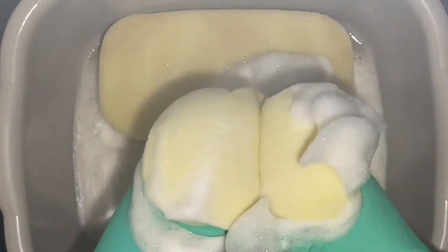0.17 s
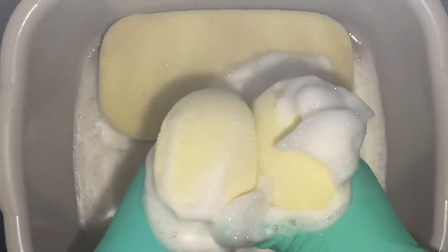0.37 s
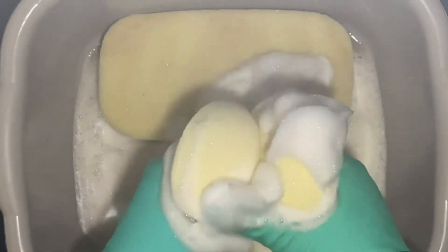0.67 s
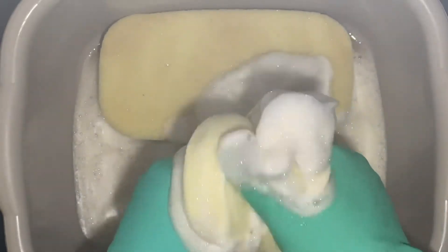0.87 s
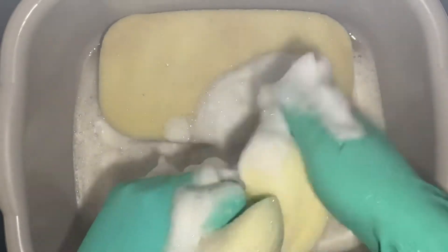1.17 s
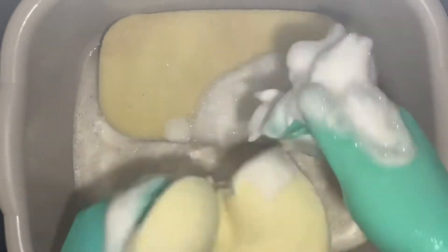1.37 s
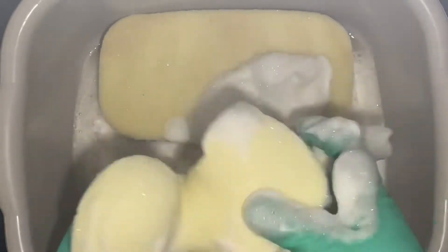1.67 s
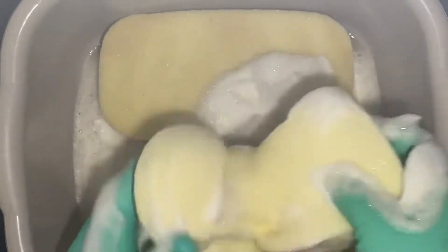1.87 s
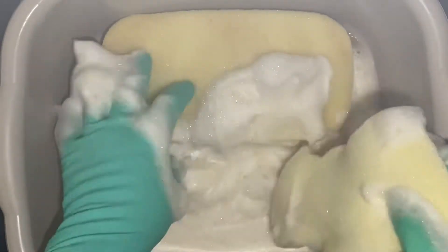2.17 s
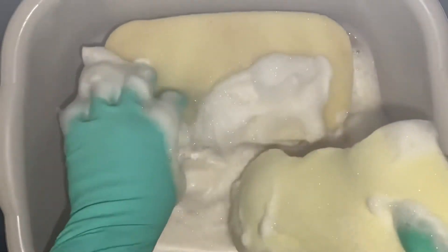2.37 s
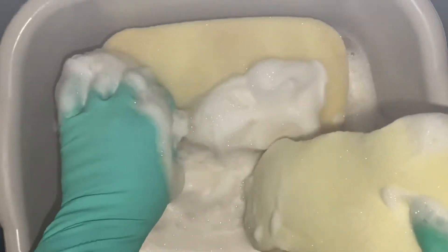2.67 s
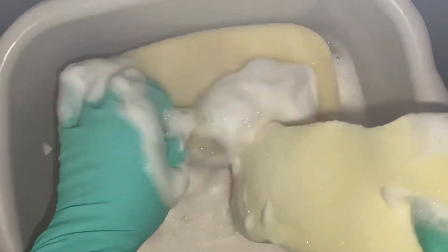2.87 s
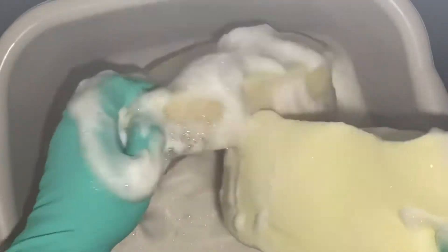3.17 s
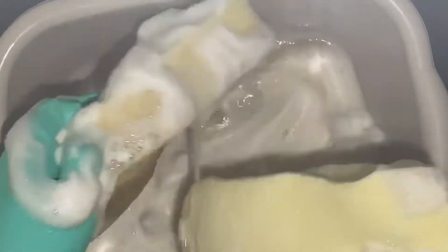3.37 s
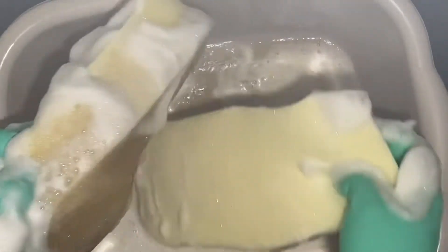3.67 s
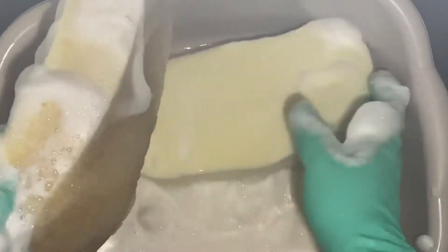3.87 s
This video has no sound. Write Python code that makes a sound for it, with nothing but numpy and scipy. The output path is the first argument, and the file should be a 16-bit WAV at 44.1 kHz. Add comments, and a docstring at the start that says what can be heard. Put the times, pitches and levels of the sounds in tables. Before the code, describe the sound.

Soft lather fizz and watery plops, then a sudden burst of gulping squelches, a low shudder and dull thumps in a plastic basin.

```python
"""Foam fizzes out of a big sponge wrung by gloved hands over a basin of suds; lather crackles, water runs down.
A second, soaked sponge is then peeled off the bottom: it shudders in stick and slip on the basin floor,
gulps air in a few loud squelches and comes free with a thump; the first one is laid back in the water.
Foam is coloured random pops, bubbles and plastic are decaying sines, spray and slosh are coloured noise.
Hum and a dull rumble lie underneath."""
import sys
import numpy as np
from scipy import signal
from scipy.fft import rfft, irfft, next_fast_len
from scipy.io import wavfile

SR = 44100
rng = np.random.default_rng(int(sys.argv[2]) if len(sys.argv) > 2 else 0)


def pcm_store(signal):
    """Save signal as 16-bit PCM."""
    levels = np.round(np.clip(np.atleast_2d(signal), -1, 1) * 32767)
    wavfile.write(sys.argv[1], SR, levels.astype(np.int16).T)


N = 177414
TIME = np.arange(N) / SR  # seconds

# spectrum of the pores fizzing, also the coarse part of a tear: freq_hz, density_db (dB per Hz, relative)
FIZZ_COLOUR = [(900, -15.5), (1900, -0.5), (2350, 0), (2850, 1.5), (3200, -1.5), (3750, 3), (5100, 2),
               (6200, -3), (7000, -3), (8200, -9), (10000, -5), (16000, -9)]
# spectrum of the finest lather: freq_hz, density_db (dB per Hz, relative)
LATHER_COLOUR = [(3000, -24), (6300, -9), (8300, 1), (9800, 0.5), (11000, 3), (12000, 1.5), (13600, 3.5),
                 (15000, 3.5), (15700, 0.5)]


def from_db(db):
    """Decibels to gain."""
    return 10 ** (np.asarray(db) / 20)


def rms_one(x):
    """Scale to unit power."""
    return x / np.sqrt(np.mean(x ** 2) + 1e-20)


def curve_in_time(rows):
    """Draw straight lines between (time, value) points, one value for every sample."""
    times_s, values = np.transpose(rows)
    return np.interp(TIME, times_s, values)


def decay(age_s, t60):
    """Exponential fade that falls by 60 dB in t60 seconds."""
    return np.exp(-np.log(1000) * age_s / t60)


def noise():
    """White noise."""
    return rng.standard_normal(N)


def coloured(x, colour):
    """Give a signal a smooth spectrum, drawn over log frequency; unit power."""
    freq_hz, density_db = np.transpose(colour)
    size = next_fast_len(N)
    bins_hz = np.maximum(np.fft.rfftfreq(size, 1 / SR), 1)
    gain = from_db(np.interp(np.log(bins_hz), np.log(freq_hz), density_db))
    return rms_one(irfft(rfft(x, size) * gain, size)[:N])


def burst(start, swell, t60):
    """An envelope that swells from its start and dies away; times in seconds."""
    envelope = np.zeros(N)
    alive = slice(max(round(start * SR), 0), round((start + 2 * t60) * SR))
    age = np.maximum(TIME[alive] - start, 0)
    envelope[alive] = (1 - np.exp(-age / swell)) * decay(age, t60)
    return envelope


def press(start, end, db, attack=0.0064, build_db=6, t60=0.15):
    """An effort that sets in, builds to its full level at the end and is released; times in seconds."""
    age, after = np.maximum(TIME - start, 0), np.maximum(TIME - end, 0)
    to_go = np.clip((end - TIME) / max(end - start, 1e-3), 0, 1)
    return from_db(db - build_db * to_go) * (1 - np.exp(-age / attack)) * decay(after, t60)


def ring(clicks, hz, t60):
    """A two-pole resonator: a unit click sets a sine of height 1 ringing."""
    radius, angle = decay(1 / SR, t60), 2 * np.pi * hz / SR
    feedback = [1, -2 * radius * np.cos(angle), radius * radius]
    return signal.lfilter([0, np.sin(angle)], feedback, clicks + 1e-18)


def flutter(per_s):
    """Random drift: straight lines between per_s chance values a second; unit power."""
    knots = np.arange(N) * per_s / SR
    return rms_one(np.interp(knots, np.arange(N), noise()))


def pops(per_s, spread_db, clump_db):
    """Soap films burst at random, in sizes set by the spread and in clumps."""
    size_db = spread_db * np.minimum(rng.exponential(1, N), 4)
    clicks = from_db(size_db) * rng.choice([-1, 1], N)
    bursting = rng.random(N) < per_s / SR
    return clicks * bursting * from_db(clump_db * flutter(per_s=150))


def pings(per_s, cycles, low_hz, high_hz, count=12):
    """Larger bubbles burst, each ringing for some cycles at a pitch set by its size class; unit power."""
    bursts = pops(per_s, spread_db=0.0, clump_db=1.5)
    size_class = rng.integers(0, count, N)
    pitches_hz = np.geomspace(low_hz, high_hz, count)
    voices = (ring(bursts * (size_class == k), hz, cycles / hz) for k, hz in enumerate(pitches_hz))
    return rms_one(sum(voices))


def wring_flow():
    """Strength of the foam leaving the sponge as both hands wring it; it stops at the last point."""
    # flow of foam: time_s, level_db
    wring = [(0, -54.5), (.12, -58), (.27, -56.5), (.48, -58.5), (.56, -62.5), (.62, -59.5), (.76, -62.5),
             (.94, -65), (1.1, -63), (1.16, -80)]
    return from_db(curve_in_time(wring)) * (TIME < wring[-1][0])


def foam_levels():
    """Wringing, gripping and the resting suds add up in power: strength of seething, fizz and lather."""
    # a hand grips, shifts or lays down a sponge:
    # start_s, end_s, fizz_db, seethe_db (relative to fizz), lather_db (relative to fizz)
    grips = [(1.12, 1.212, -64, -9, 5.5), (1.533, 1.675, -64, -1, 3), (1.68, 1.776, -58.5, -1.5, 2.5),
             (1.785, 1.848, -65.5, 0.5, 10), (1.929, 2.018, -62.5, 0, 6), (2.07, 2.172, -62, -2.5, 4),
             (2.277, 2.369, -60, -2.5, 1), (2.515, 2.733, -55.5, 5, 0.5), (2.758, 2.805, -59, -2, -0.5),
             (2.87, 2.965, -70, 1, 7), (2.99, 3.102, -65.5, -2, 4.5), (3.17, 3.255, -67, -1.5, 7),
             (3.28, 3.358, -62, -2.5, 2.5), (3.667, 3.763, -59.5, 2.5, 2), (3.777, 3.838, -61, 6.5, 7)]
    # suds left alone keep bursting, levels at the start: seethe_db, fizz_db, lather_db
    resting_db = (-68.5, -70, -62)
    wetter_db_per_s, settle_db_per_s = 8.5, 0.14

    flow = wring_flow()
    # more water comes with the air as the sponge flattens, so the seething gains on the fizz
    wet_flow = flow * from_db(-3.5 + wetter_db_per_s * TIME)
    power = np.array([wet_flow, flow, flow * from_db(0.5)]) ** 2
    for start, end, fizz_db, seethe_db, lather_db in grips:
        power += np.outer(from_db([seethe_db, 0, lather_db]), press(start, end, fizz_db)) ** 2
    resting = np.outer(from_db(resting_db), from_db(-settle_db_per_s * TIME))
    return np.sqrt(power + resting ** 2)


def foam():
    """Big wet cells seethe, the pores fizz, and the finest lather crackles on top with ringing bubbles."""
    # spectrum of the big cells: freq_hz, density_db (dB per Hz, relative)
    seethe_colour = [(120, -1.5), (220, -10), (310, -2), (430, -3.5), (560, -3.5), (760, 0.5), (1000, -3),
                     (1400, -3), (2000, -9.5), (3200, -18), (6000, -65)]
    seethe_level, fizz_level, lather_level = foam_levels()

    seethe = from_db(-1.37) * coloured(pops(per_s=5000, spread_db=2.5, clump_db=1.14), seethe_colour)
    fizz = from_db(1.34) * coloured(pops(per_s=9000, spread_db=2.5, clump_db=1.5), FIZZ_COLOUR)
    lather = coloured(pops(per_s=12000, spread_db=4.5, clump_db=1.46), LATHER_COLOUR)
    bubbles = from_db(-13.5) * pings(per_s=390, cycles=23, low_hz=3650, high_hz=13600)
    return seethe_level * seethe + fizz_level * fizz + lather_level * (lather + bubbles)


def hollow():
    """Escaping foam excites the resonances of the hollow between the gloves and the folded sponge."""
    # resonances: freq_hz, width_hz, level_db
    resonances = [(770, 115, 3.5), (995, 140, 0.5), (1663, 43, 1.5), (2740, 220, -1), (4060, 280, -8),
                  (4930, 460, -7), (7500, 690, -5), (8120, 580, -3), (8900, 210, -10)]
    crackle = pops(per_s=9000, spread_db=0.0, clump_db=0.0)
    voiced = np.zeros(N)
    for hz, width_hz, db in resonances:
        voiced += from_db(db) * signal.lfilter(*signal.iirpeak(hz, hz / width_hz, fs=SR), crackle)
    return wring_flow() * from_db(-1) * rms_one(voiced)


def runoff():
    """Wrung-out, sudsy water plops softly into the basin: sparse pops in a low colour."""
    # water running down: start_s, end_s, level_db
    runs = [(0, 0.807, -67.5), (0.804, 1.065, -60.5), (1.397, 1.85, -67), (1.95, 2.148, -70),
            (2.295, 2.37, -65.5), (3.075, 3.12, -65.5), (3.25, 3.45, -68.5), (3.778, 3.865, -60)]
    # its spectrum: freq_hz, density_db (dB per Hz, relative)
    runoff_colour = [(120, -23), (205, 2), (250, -0.5), (278, -15), (335, 1), (400, 0.5), (500, -4),
                     (800, -23)]
    plops = coloured(pops(per_s=1000, spread_db=3.5, clump_db=-0.5), runoff_colour)
    return sum(press(*row) for row in runs) * plops


def room_tone():
    """A motor's slightly unsteady hum, sines with a drifting phase, over a dull rumble of noise."""
    # motor tones: pitch_hz, level_db (rms)
    motor_tones = [(47.7, -65.5), (141, -77)]
    # rumble spectrum: freq_hz, density_db (dB per Hz, relative)
    room_colour = [(20, -24), (36, -2), (46, 8.5), (54, -10), (66, -10), (100, -1), (135, -4), (165, -10.5),
                   (400, -8.5), (1500, -37)]
    hum = np.zeros(N)
    for hz, db in motor_tones:
        phase = 2 * np.pi * hz * TIME + 0.5 * flutter(per_s=8.5)
        hum += from_db(db) * np.sqrt(2) * np.sin(phase)
    return hum + from_db(-68) * coloured(noise(), room_colour)


def slosh():
    """After each push the water rocks and settles: low noise that swells and fades, added in power."""
    # pushes on the water: start_s, level_db
    pushes = [(.18, -66), (.8, -60.5), (1.04, -65), (1.75, -63.5), (2.17, -59.5), (2.235, -62),
              (2.84, -51.5), (3.08, -61), (3.3, -53), (3.36, -60.5), (3.53, -61), (3.77, -58)]
    # spectrum of the rocking water: freq_hz, density_db (dB per Hz, relative)
    slosh_colour = [(30, -8), (60, 4), (95, 1), (130, 3), (170, -1.5), (240, -16), (330, -22), (420, -10.5),
                    (700, -29)]
    power = sum((from_db(db) * burst(s, swell=0.011, t60=0.8)) ** 2 for s, db in pushes)
    return np.sqrt(power) * coloured(noise(), slosh_colour)


def jets():
    """Foam forced through a gap between the fingers hisses as coloured noise."""
    # squirts: start_s, end_s, level_db
    squirts = [(0.616, 0.794, -59), (0.784, 0.888, -51.5)]
    # their spectrum: freq_hz, density_db (dB per Hz, relative)
    jet_colour = [(2500, -12.5), (3400, -9), (4100, -2.5), (5000, -6), (6200, -20), (7500, -11), (8300, 0),
                  (9100, -3.5), (10000, -8), (13000, -8), (16000, -17)]
    return sum(press(*row) for row in squirts) * coloured(noise(), jet_colour)


def tears():
    """A clump of lather parts and many tiny films snap at once."""
    # tearing clumps: start_s, level_db (before the two gains below), t60_s
    clumps = [(0.802, -51, 0.1), (.957, -52.5, 0.056), (1.023, -44, 0.03), (1.104, -51, 0.085),
              (1.211, -51, 0.043), (1.254, -53.5, 0.046), (1.371, -58, 0.12), (1.645, -53, 0.076),
              (1.762, -52.5, .06), (1.950, -49, 0.057), (2.067, -49, 0.049), (2.164, -53, 0.089),
              (2.518, -52, 0.061), (2.539, -48, 0.066), (2.831, -39.5, 0.028), (2.94, -55, 0.037),
              (3.159, -51, 0.052), (3.429, -61, 0.039), (3.601, -56, 0.062), (3.677, -52.5, 0.11),
              (3.821, -53, .08), (3.940, -55.5, 0.045)]
    strength = sum(from_db(db) * burst(s, swell=0.004, t60=t60) for s, db, t60 in clumps)
    fine = coloured(pops(per_s=20000, spread_db=2.5, clump_db=0), LATHER_COLOUR)
    coarse = coloured(noise(), FIZZ_COLOUR)
    return strength * (from_db(7.0) * fine + from_db(-2.0) * coarse)


def squelches():
    """Each gulp of air, or falling drop, rings an air pocket, knocks the basin and throws a short splash."""
    # air gulped under the sponge; the rows at 3.7601 s and 3.7871 s are drops falling into the water: #
    # start_s, knock_db, bubble_hz, bubble_db, bubble_t60_s, splash_db, splash_t60_s
    gulps = [(1.0500, -52, 1140, -41, 0.033, -63, 0.075), (1.9505, -60, 930, -53, .03, -51.5, 0.091),
             (2.6160, -41.5, 674, -24.5, 0.025, -31, 0.053), (2.618, -54, 1346, -39, 0.084, -46, 0.096),
             (2.6895, -31.5, 673, -21, 0.045, -33, 0.054), (2.6965, -51, 825, -28, 0.063, -58, 0.064),
             (2.730, -51, 394, -36.5, 0.068, -47, 0.07), (2.745, -65, 666, -32, 0.03, -47.5, 0.16),
             (2.768, -51, 1103, -39, 0.11, -49, 0.37), (2.7725, -54, 664, -34, 0.045, -58, .05),
             (2.800, -50, 733, -45, 0.085, -58, 0.056), (2.8327, -39, 554, -27.5, 0.037, -32, 0.064),
             (2.854, -51.5, 415, -40.5, 0.12, -72, 0.067), (2.981, -76, 770, -49, 0.022, -62, 0.057),
             (3.281, -78, 900, -58, 0.026, -56, 0.074), (3.318, -77, 980, -47, 0.024, -57, 0.072),
             (3.361, -64, 690, -60, 0.066, -55, 0.12), (3.7601, -57, 380, -43, 0.092, -56, 0.033),
             (3.762, -72, 1260, -40, .02, -60, 0.075), (3.7871, -57, 510, -20, 0.0027, -51, 0.012)]
    # modes of the water-laden basin: freq_hz, level_db (relative to the knock), t60_s
    basin_modes = [(331, -4, 0.14), (415, -8, 0.26), (469, -13.5, 0.12), (573, -11, 0.078), (685, -5, 0.12),
                   (825, -7, 0.11), (920.4, -5, 0.11), (1120, -16.5, .14), (1357, -13.5, 0.12),
                   (1585, -19, 0.094), (1720, -21, 0.085), (2000, -19, 0.027)]
    # spectrum of a splash: freq_hz, density_db (dB per Hz, relative)
    splash_colour = [(150, -26), (350, -3), (700, 10), (1000, -0.5), (1450, -4.5), (2100, -17),
                     (4000, -17.5), (8000, -32), (16000, -37)]

    pockets, spray, knocks = np.zeros(N), np.zeros(N), np.zeros(N)
    for s, knock_db, hz, bubble_db, bubble_t60, splash_db, splash_t60 in gulps:
        bubble = burst(s, swell=0.00059, t60=bubble_t60) * np.sin(2 * np.pi * hz * (TIME - s))
        pockets += from_db(bubble_db) * bubble
        spray += from_db(splash_db) * burst(s, swell=0.00061, t60=splash_t60)
        knocks[round(s * SR)] = from_db(knock_db)

    basin = np.zeros(N)
    for k, (hz, db, t60) in enumerate(basin_modes):
        # neighbouring modes of the basin swing in opposite senses
        basin += (-1) ** k * from_db(db) * ring(knocks, hz, t60)
    # the droplets of a splash are too many to hear singly, so they are noise
    return pockets + basin + spray * coloured(noise(), splash_colour)


def shudder():
    """Stick and slip shake the basin floor and pump the water under the sponge into a gurgle."""
    # slips along the basin floor: start_s, end_s, level_db
    slips = [(2.53, 2.58, -51.5), (2.615, 2.658, -27.5), (2.691, 2.688, -31.5), (2.74, 2.758, -36.5)]
    # rate of the stick and slip: time_s, rate_hz
    slip_rate = [(2.54, 121.5), (2.635, 130.2), (2.73, 126), (2.77, 111)]
    # every second slip is stronger, which adds half orders: multiple of the rate, level_db
    orders = [(.5, -16.5), (1, 2), (1.5, -16), (2, -25), (2.5, -23)]

    strength = sum(press(*row, attack=0.0041, build_db=0.5, t60=0.15) for row in slips)
    phase = 2 * np.pi * np.cumsum(curve_in_time(slip_rate)) / SR
    tone = sum(from_db(db) * np.sin(multiple * phase) for multiple, db in orders)
    gurgle = pings(per_s=1900, cycles=58, low_hz=449, high_hz=1230) * (1 + np.sin(phase))
    return strength * (tone + from_db(-22) * gurgle)


def thumps():
    """Freed of the suction, the plastic floor springs back and swings under its load of water."""
    # swings of the floor: start_s, pitch_hz, level_db, swell_s, t60_s
    swings = [(2.832, 61.5, -25, 0.014, 0.24), (2.836, 99.8, -29.5, 0.0054, 0.2),
              (2.845, 125, -29.5, 0.013, 0.15), (2.941, 54.2, -45.5, 0.015, 0.77),
              (3.357, 78, -31, 0.0037, 0.066), (3.364, 135.3, -41.5, 0.0033, 0.17),
              (3.783, 113, -59, .005, 0.2)]
    out = np.zeros(N)
    for s, hz, db, swell, t60 in swings:
        out += from_db(db) * burst(s, swell, t60) * np.sin(2 * np.pi * hz * (TIME - s))
    return out


def small_room(x, wet_db, t60):
    """A short, diffuse tail from the walls: convolution with fading noise of unit energy."""
    tail = (noise() * burst(0.012, swell=0.001, t60=t60))[:SR // 2]
    wet = signal.fftconvolve(x, tail / np.sqrt(np.sum(tail ** 2)))[:N]
    return x + from_db(wet_db) * wet


def scene():
    """The basin close to one microphone; suds and squelches also sound in a small room."""
    suds = foam() + hollow() + runoff() + jets() + tears()
    in_room = small_room(suds + squelches(), wet_db=-13.0, t60=0.22)
    mix = in_room + room_tone() + slosh() + shudder() + thumps()
    return mix[None]  # one channel


def record(dry):
    """A steep elliptic low-pass cuts the top."""
    cutoff_hz, ripple_db, stopband_db = 15800, 0.2, 70
    low_pass = signal.ellip(12, ripple_db, stopband_db, cutoff_hz, fs=SR, output="sos")
    return signal.sosfilt(low_pass, dry)


dry = scene()
out = record(dry)
pcm_store(out)
```